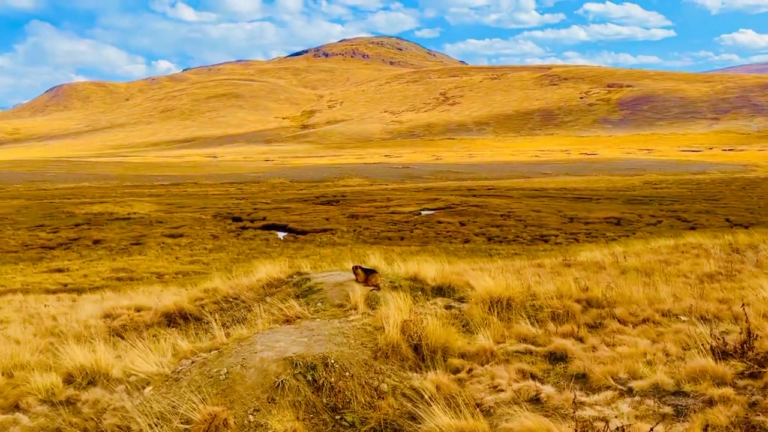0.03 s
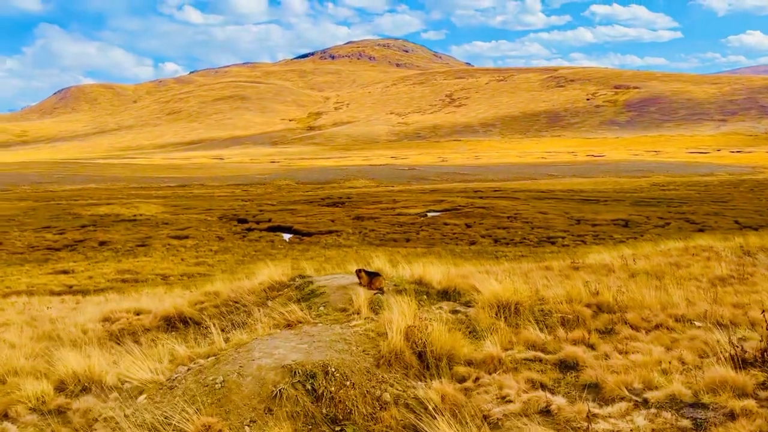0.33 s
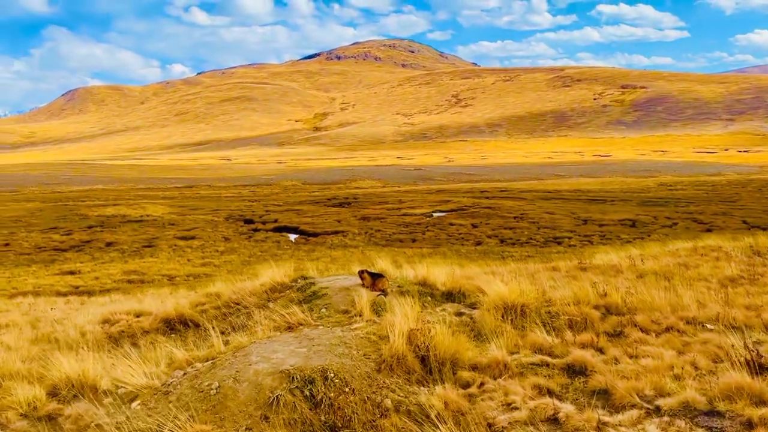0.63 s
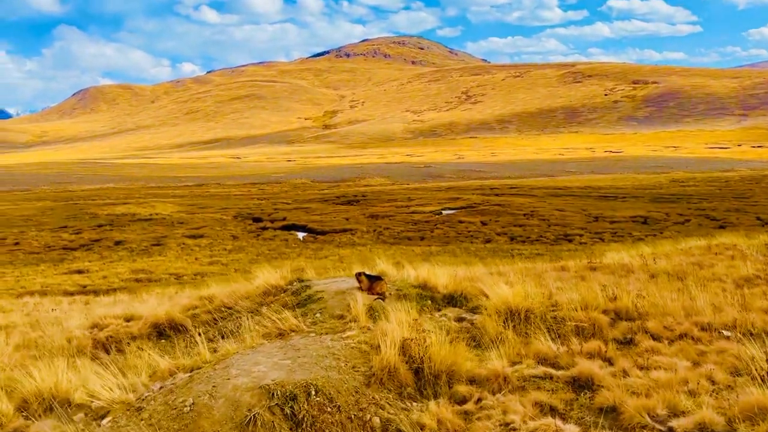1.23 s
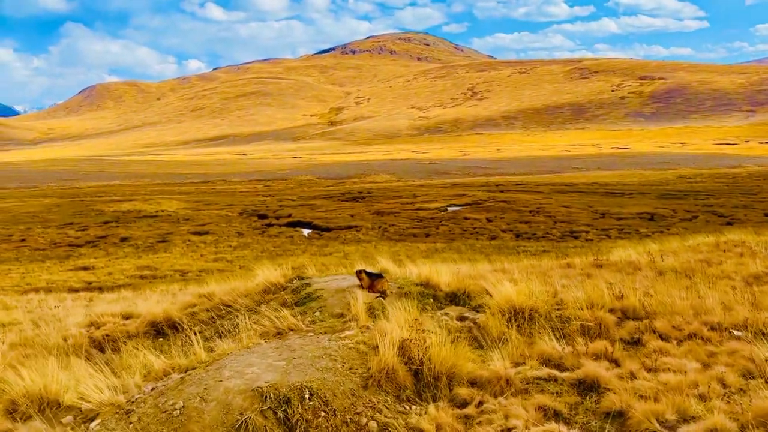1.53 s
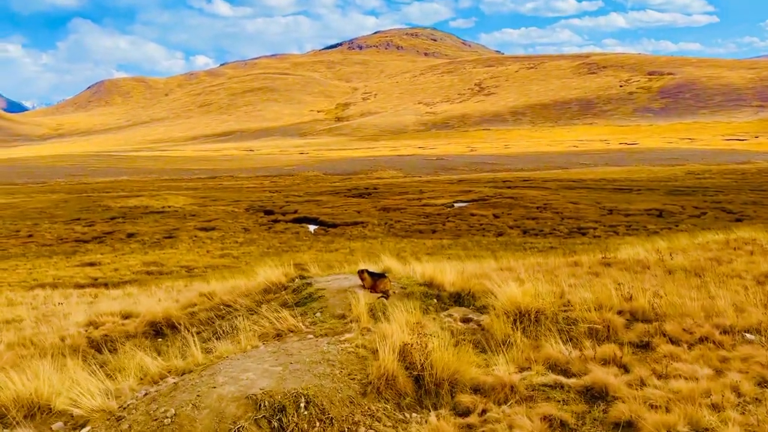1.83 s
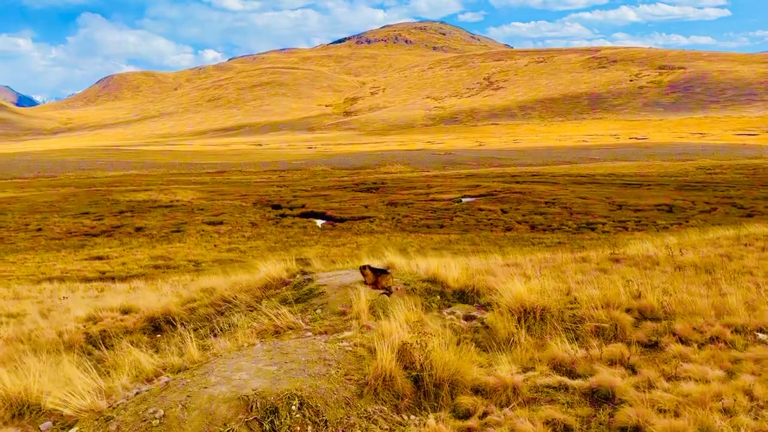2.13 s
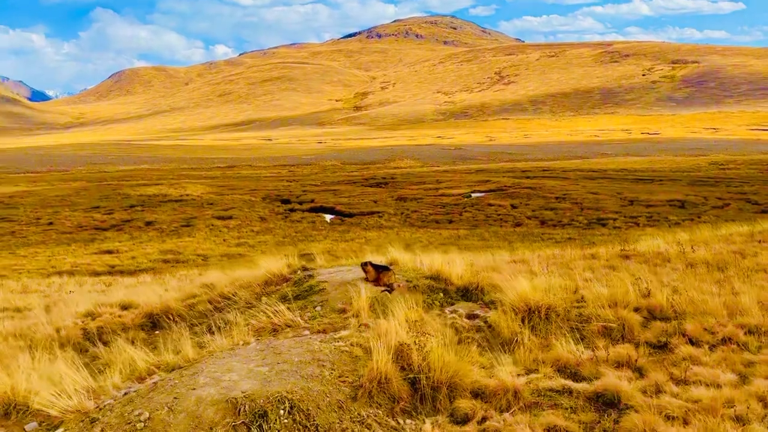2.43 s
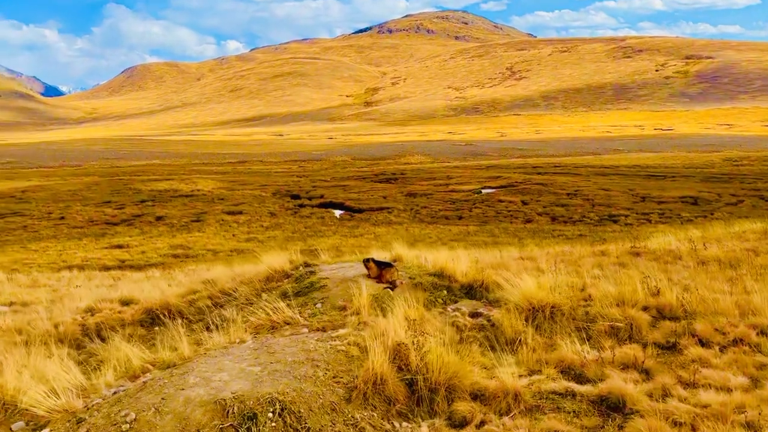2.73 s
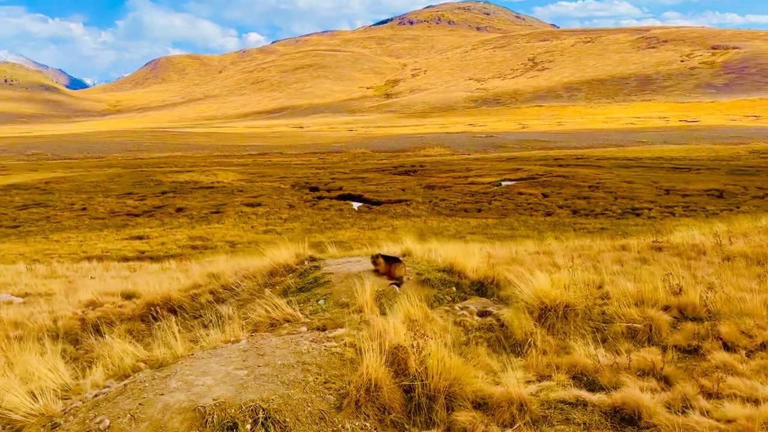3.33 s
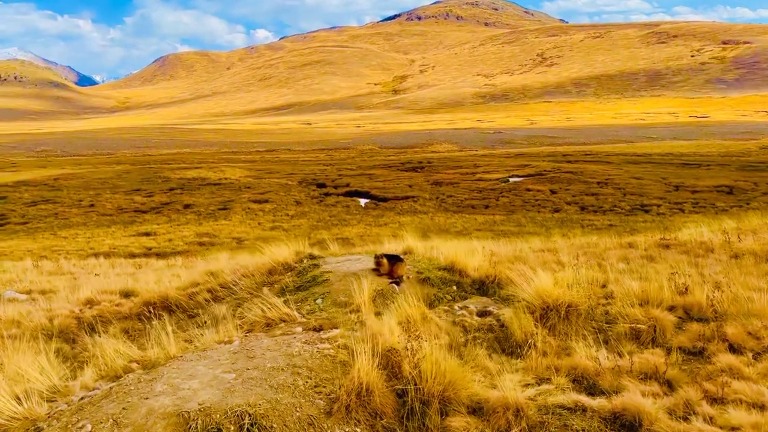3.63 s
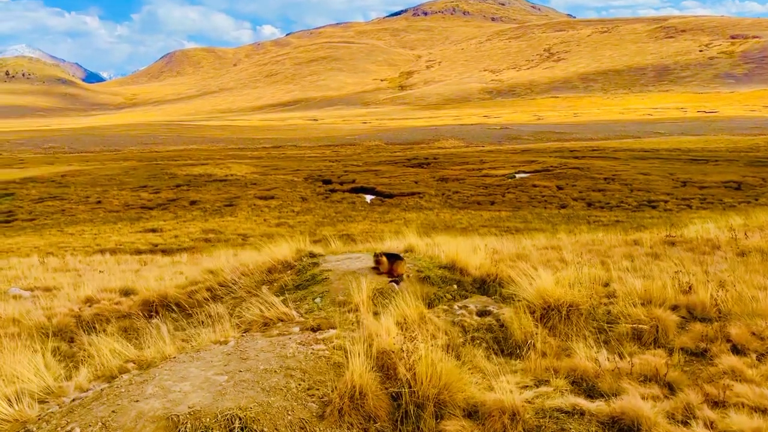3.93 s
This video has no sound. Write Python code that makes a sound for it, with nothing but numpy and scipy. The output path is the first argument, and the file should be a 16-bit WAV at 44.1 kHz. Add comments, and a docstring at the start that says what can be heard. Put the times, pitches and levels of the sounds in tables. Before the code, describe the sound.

A marmot gives harsh, rapid alarm chirps over wind rumbling on the microphone.

```python
"""Open grassland, a stereo microphone out in the wind, a marmot calling from its burrow mound.
It gives harsh alarm chirps, nearly four a second, each a run of uneven rasping pulses in its throat
resonances: a loud head, a weaker hold, a quick release. Dry grass hisses faintly behind it.
Wind rumbles and buffets on the microphone's two ports, now and then overloading it."""
import sys
import numpy as np
from scipy import signal
from scipy.fft import rfft, irfft
from scipy.io import wavfile
from scipy.ndimage import uniform_filter1d, minimum_filter1d, map_coordinates

SR = 44100
rng = np.random.default_rng(int(sys.argv[2]) if len(sys.argv) > 2 else 0)


def inscribe(sig):
    """Save sig as 16-bit PCM at rate SR to the path in sys.argv[1].

    A 1-D sig is mono; a 2-D sig holds one channel per row.
    Samples are clipped to [-1, 1] before scaling.
    """
    pcm = np.round(np.clip(np.atleast_2d(sig).T, -1, 1) * 32767)
    wavfile.write(sys.argv[1], SR, pcm.astype(np.int16))


N = 176400
TIME = np.arange(N) / SR
BIN_HZ = np.maximum(np.arange(N // 2 + 1) * SR / N, 1)


def from_db(db):
    """Decibels to gain."""
    return 10 ** (np.asarray(db) / 20)


def rms_one(x):
    """Scale to unit rms."""
    return x / np.sqrt(np.mean(x ** 2) + 1e-20)


def level(rows):
    """Gain over time from rows of time_s, level_db."""
    return from_db(np.interp(TIME, *np.transpose(rows)))


def over_bins(rows):
    """Rows of freq_hz, value, interpolated to every FFT bin on a log-frequency axis."""
    hz, values = np.transpose(rows)
    return np.interp(np.log(BIN_HZ), np.log(hz), values)


def pan(db):
    """Left and right gains for a left-minus-right level."""
    return from_db(np.array([[.5], [-.5]]) * db)


def swell(t, half_s):
    """A bell-shaped rise and fall around t = 0."""
    return np.exp(-.5 * (t / half_s) ** 2)


def drift(rate_hz):
    """Slow random wander of unit rms."""
    step, settle = 40, 2000
    r = np.exp(-2 * np.pi * rate_hz * step / SR)
    noise = rng.standard_normal(N // step + settle + 2)
    slow = signal.lfilter([1], [1, -2 * r, r * r], noise)[settle:]
    return np.interp(np.arange(N) / step, np.arange(len(slow)), rms_one(slow))


def resonate(x, hz, width_hz, stages=1):
    """A resonance with gain 1 at its peak; more stages make it narrower and steeper."""
    r = np.exp(-np.pi * width_hz / SR)
    poles = [1, -2 * r * np.cos(2 * np.pi * hz / SR), r * r]
    for _ in range(stages):
        x = signal.lfilter(np.array([1, 0, -1]) * (1 - r * r) / 2, poles, x + 1e-18)
    return x


def air(spectrum):
    """Separate noise of a given colour at each of the two ports; rms 1."""
    white = rfft(rng.standard_normal((2, N)))
    return rms_one(irfft(from_db(over_bins(spectrum)) * white, N))


def gusting(eddies, depth_db):
    """Level swings from passing eddies; rms 1."""
    return rms_one(from_db(depth_db * np.clip(eddies, -2.5, 2)))


def grass():
    """Dry grass hisses in the breeze and gives one narrow, high swish."""
    # rise and fall of the hiss: time_s, level_db
    hiss_level = [(0, -51), (.25, -43.5), (.5, -52.5), (.75, -50), (1.0, -51.5), (1.3, -46), (1.62, -44.5),
                  (1.88, -57.5), (2.15, -53.5), (2.45, -47.5), (2.68, -51.5), (2.82, -51.5), (2.94, -39),
                  (3.25, -54), (3.54, -47), (3.63, -53.5), (3.75, -52), (3.85, -61.5), (4, -54)]
    # colour of the hiss: freq_hz, density_db
    hiss_spectrum = [(700, 7), (1500, 7.5), (2500, 2), (4200, -2.5), (7000, 0), (9000, -5), (12000, -29.5),
                     (14500, -3.5), (17000, -11)]
    swish = rms_one(resonate(rng.standard_normal((2, N)), hz=6070, width_hz=1100, stages=2))
    hiss = level(hiss_level) * air(hiss_spectrum) * gusting(drift(25), depth_db=1.5)
    return hiss + from_db(-52) * swish * swell(TIME - 2.556, half_s=.1)


def wind():
    """Low rumble, flutter and higher rustle on the ports; the higher ranges follow the eddies most."""
    # wind strength in each range: time_s, relative_db
    rumble_level = [(0.0, -12.5), (0.03, -21.5), (0.05, -17), (0.78, -10.5), (0.8, -20.5), (0.96, -16.5),
                    (2.56, -15), (2.65, -26.5), (2.68, -17), (3.53, -19.5), (3.61, -11.5), (3.69, -19.5),
                    (3.91, -17.5), (4.0, -25)]
    flutter_level = [(0.0, -35.5), (0.07, -16), (1.86, -23), (1.89, -33.5), (2.06, -23.5), (2.58, -27),
                     (2.64, -43.5), (2.7, -16.5), (2.74, -28), (2.84, -23), (3.15, -32), (3.34, -10.5),
                     (3.53, -32), (3.58, -12), (3.79, -37), (3.83, -18.5), (3.98, -25.5), (4.0, -22)]
    rustle_level = [(0.0, -38.5), (0.67, -29), (1.75, -39.5), (1.77, -30.5), (2.0, -46), (2.06, -26.5),
                    (2.17, -59), (2.21, -30.5), (2.66, -52), (2.68, -39), (2.87, -55), (2.93, -34.5),
                    (2.94, -38.5), (3.17, -51), (3.56, -43), (3.6, -21), (3.63, -61.5), (4.0, -65)]
    # colour of each range: freq_hz, density_db
    rumble_spectrum = [(20, -29.5), (32, -28), (45, -5), (60, -1.5), (100, -3), (150, -8.5), (210, -17.5),
                       (320, -25.5), (600, -91.5)]
    flutter_spectrum = [(70, -27), (140, -6), (220, -0.5), (330, -5), (470, -9), (650, -21), (1000, -67.5),
                        (1800, -74.5)]
    rustle_spectrum = [(250, -50), (450, 0), (620, 6), (850, -2.5), (1200, -13.5), (1800, -29.5),
                       (3000, -37.5), (6000, -49), (12000, -63)]
    eddies = rms_one(.65 * drift(35) + np.array([drift(25), drift(30)]))  # partly shared by the ports
    rumble = from_db(4.5) * level(rumble_level) * air(rumble_spectrum) * gusting(eddies, depth_db=2)
    flutter = from_db(3.5) * level(flutter_level) * air(flutter_spectrum) * gusting(eddies, depth_db=6)
    rustle = from_db(10) * level(rustle_level) * air(rustle_spectrum) * gusting(eddies, depth_db=7.5)
    return rumble + flutter + rustle


def buffets():
    """Single strong eddies swell and die within hundredths of a second, mostly on one port."""
    # eddies striking the microphone: centre_s, half_length_s, level_db, port_balance_db
    hits = [(.113, 0.0034, -6.5, -7.5), (.183, 0.0018, -9.5, 9), (.443, 0.005, -14, -9.5),
            (0.521, .006, -10, -11.5), (0.6, 0.0026, -11.5, -10), (0.663, 0.0044, -14, 4),
            (0.688, 0.0019, -13, -4), (0.836, 0.02, -10.5, 10.5), (0.94, 0.011, -11, -8.5),
            (1.029, 0.0056, -13.5, 1), (1.132, 0.0065, -14, -16), (1.375, 0.04, -14, 12),
            (1.5, 0.0036, -13.5, -11.5), (1.771, 0.0024, -17, -10.5), (1.835, 0.0059, -11, 3.5),
            (2.066, 0.01, -17, -17), (2.121, 0.0059, -13, 13), (2.209, 0.0065, -16, -8.5),
            (2.695, 0.0034, -7, 12.5), (2.827, 0.0055, -8, -10.5), (2.949, 0.0065, -10.5, 12),
            (3.255, 0.015, -21, -10.5), (3.309, 0.0078, -17.5, 7.5), (3.592, 0.0068, -4.5, -14.5),
            (3.834, 0.0027, -24, 9), (3.878, 0.0036, -15, -9.5)]
    # colour of a buffet: freq_hz, density_db
    spectrum = [(80, -46), (170, -0.5), (300, 0.5), (450, -2), (650, -19.5), (1000, -39), (2000, -49.5),
                (5000, -88)]
    envelope = sum(from_db(db) * pan(balance_db) * swell(TIME - centre_s, half_s)
                   for centre_s, half_s, db, balance_db in hits)
    return air(spectrum) * envelope


def pops():
    """Dry grass crackles: brief sharp snaps, dulled and ringing for an instant."""
    # grass crackles: start_s, relative_db
    snaps = [(.47, -22), (.509, -32), (0.656, -30), (0.828, -19), (.91, -13.5), (1.018, -23), (1.049, -22),
             (2.698, -14), (2.894, -16), (2.9222, -3)]
    dull_hz, ring_hz, width_hz = 2000, 1020, 370
    clicks = np.zeros(N)
    for start_s, db in snaps:
        clicks[int(start_s * SR)] += from_db(db)
    dulled = signal.sosfilt(signal.butter(1, dull_hz, fs=SR, output="sos"), clicks + 1e-18)
    makeup_gain = SR / (2 * np.pi * width_hz)
    return resonate(dulled, ring_hz, width_hz) * makeup_gain * pan(db=-2.5)


def stereo_image(ports):
    """Each port feeds both channels, with a phase shift that sets how alike they are."""
    # likeness of left and right: freq_hz, correlation
    likeness = [(60, 0.48), (130, 0.22), (290, -0.15), (640, -0.42), (1410, 0.28), (3100, 0.14),
                (6800, .08), (15000, -0.25)]
    turn = np.exp(.5j * np.arccos(np.clip(over_bins(likeness), -1, 1)))
    a, b = rfft(ports)
    return irfft(np.array([a * turn + b / turn, a / turn + b * turn]), N) / np.sqrt(2)


def ground_scatter(calls, level_db=-28, t60_s=.27):
    """A faint, short echo scattered from grass and ground."""
    t = TIME[:SR // 2]
    tail = rng.standard_normal((2, len(t))) * from_db(-60 * t / t60_s)
    tail /= np.sqrt(np.sum(tail[0] ** 2))
    return from_db(level_db) * signal.fftconvolve(calls, tail, axes=1)[:, :N]


def squeak(t, hz, fall_hz_per_s, half_s):
    """A thin, brief whistle that plunges through hz at t = 0."""
    return np.sin(2 * np.pi * (hz - .5 * fall_hz_per_s * t) * t) * swell(t, half_s)


def voiced_glide(t, start_hz, fall_s=.035, jitter=.018):
    """The voiced part of a chirp: an unsteady pitch that plunges throughout."""
    # harmonics of the voice, fundamental first: relative_db
    harmonics = [-6.5, -9.5, -17, -18.5]
    wobble = rms_one(uniform_filter1d(rng.standard_normal(len(t)), size=30))
    pitch_hz = start_hz * np.exp(-t / fall_s) * (1 + jitter * wobble)
    phase = 2 * np.pi * np.cumsum(pitch_hz) / SR
    return np.sqrt(2) * sum(from_db(db) * np.sin(k * phase) for k, db in enumerate(harmonics, 1))


def air_puffs(t, length_s, sharpest_s):
    """Uneven puffs over steady breath, with one sharp pulse and another as the throat closes."""
    rate_hz, jitter, decay_s, breath = 480, .37, .00068, .23
    spread_db, sharpest_db, closing_db = .5, 6, -10
    gap_chance, size_chance = rng.standard_normal((2, 60))
    starts = (np.cumsum(np.exp(jitter * gap_chance)) - 1) / rate_hz
    starts = np.append(starts, [sharpest_s, length_s - .002])
    sizes = from_db(np.append(-spread_db * np.clip(size_chance, -2, 2), [sharpest_db, closing_db]))
    age = t - starts[:, None]
    return breath + sizes @ ((age >= 0) * np.exp(-np.abs(age) / decay_s))


def throat(puffs, resonances, stretch):
    """Pulsed turbulence through steep throat resonances, its slow level evened."""
    rasp = np.zeros(len(puffs))
    for hz, width_hz, db in resonances:
        turbulence = puffs * rng.standard_normal(len(puffs))
        rasp += from_db(db) * resonate(turbulence, hz * stretch, width_hz, stages=2)
    return rasp / np.sqrt(uniform_filter1d(rasp ** 2, size=700) + 1e-12)


def chirp_envelope(t, head_db, hold_db, length_s):
    """Fast attack, loud head, weaker hold, quick release."""
    attack_s, head_s, head_fade_s, release_db_per_s = .0018, .018, .006, 1897
    head = .5 - .5 * np.tanh((t - head_s) / head_fade_s)
    release_db = release_db_per_s * np.maximum(t - length_s, 0)
    return np.clip(t / attack_s, 0, 1) * from_db(hold_db + (head_db - hold_db) * head - release_db)


def marmot(left_lead_s=.00014):
    """Chirps with a bright throat band, a lower rasp and a falling voice, reaching the left port first."""
    # alarm chirps: start_s, head_db, hold_db, length_s, sharpest_pulse_s, resonance_hz,
    # start_pitch_hz, voiced_db, closing_squeak_db
    chirps = [(.003, -20, -23, .044, 0.0081, 6640, 3930, -5.5, -42),
              (0.284, -15.5, -20, .044, .012, 6500, 4110, -3, -31),
              (0.567, -21.5, -22, 0.036, 0.067, 6450, 4460, -3, -22),
              (0.84, -21, -27, 0.036, 0.0071, 6600, 3340, -7.5, -46),
              (1.111, -20.5, -22.5, 0.038, 0.014, 6510, 2905, -4.5, -42),
              (1.392, -20.5, -25.5, 0.037, 0.00078, 6650, 3600, -10.5, -46),
              (1.666, -16, -23.5, 0.037, 0.019, 6640, 4230, -12, -30),
              (1.951, -17, -29, 0.037, 0.0089, 6670, 3610, -8, -43),
              (2.224, -25, -25, 0.036, 0.0042, 6600, 3770, -5, -32.5),
              (2.501, -21.5, -27, 0.036, 0.0036, 6630, 2740, -2, -48),
              (2.777, -26, -27, 0.031, 0.0082, 6420, 3530, -10, -49),
              (3.07, -15.5, -18, 0.034, 0.016, 6650, 3880, -5.5, -39),
              (3.355, -16, -23.5, 0.04, 0.0046, 6710, 3570, -3.5, -34),
              (3.664, -16, -22, 0.04, 0.017, 6540, 3700, -12, -33.5),
              (3.945, -13.5, -28, 0.034, 0.014, 6700, 3050, -9.5, -30)]
    # bright throat resonances, for a main resonance of 6600 Hz: centre_hz, width_hz, relative_db
    bright_bands = [(6210, 890, -2), (6760, 920, -4), (7554, 730, -4), (9040, 1220, -9),
                    (10000, 620, -33.5), (12310, 390, -16), (14470, 960, -14.5)]
    # lower resonances of the rasp: centre_hz, width_hz, relative_db
    rasp_bands = [(1320, 560, 4.5), (2185, 600, 3.5), (3490, 510, 7), (4580, 500, -6.5)]
    ports, t = np.zeros((2, N + SR)), TIME[:SR // 10]
    for start_s, head_db, hold_db, length_s, sharpest_s, hz, pitch_hz, voiced_db, squeak_db in chirps:
        puffs = air_puffs(t, length_s, sharpest_s)
        stretch = hz / 6600
        direct = throat(puffs, bright_bands, stretch) * pan(db=1.5)
        scattered = from_db(-9) * np.array([throat(puffs, bright_bands, stretch) for _ in range(2)])
        bright = from_db(-1.5) * (direct + scattered) * chirp_envelope(t, head_db, hold_db, length_s)
        rasp = from_db(-7.5) * throat(puffs, rasp_bands, stretch)
        voiced = from_db(voiced_db - .5) * voiced_glide(t, pitch_hz)
        low = (rasp + voiced) * pan(db=-5.5) * chirp_envelope(t, head_db, hold_db - 6.5, length_s)
        closing = np.sqrt(2) * squeak(t - length_s, hz=6040, fall_hz_per_s=50000, half_s=.005)
        i = int(start_s * SR)
        ports[:, i:i + len(t)] += bright + low + from_db(squeak_db) * closing
    late_right = map_coordinates(ports[1], [np.arange(N) - left_lead_s * SR], order=3)
    return np.array([ports[0, :N], late_right])


def scene():
    """The marmot in open grass, two of its chirps with an extra squeak, and wind on the microphone."""
    calls = marmot()
    calls += from_db(-16) * squeak(TIME - 1.976, hz=14600, fall_hz_per_s=560000, half_s=.0015)
    calls += from_db(-8) * squeak(TIME - 3.983, hz=7300, fall_hz_per_s=330000, half_s=.0013)
    echo = ground_scatter(calls)
    breeze = stereo_image(wind() + buffets() + grass()) * pan(db=-1)
    return calls + echo + breeze + pops()


def record(dry):
    """The recorder's fast limiter holds the peaks at full scale; a steep low-pass cuts the top."""
    window_samples, cutoff_hz = 89, 15900
    gain = minimum_filter1d(1 / np.maximum(np.abs(dry), 1), size=window_samples, axis=1)
    limited = dry * uniform_filter1d(gain, size=window_samples, axis=1)
    return signal.sosfilt(signal.ellip(10, .1, 70, cutoff_hz, fs=SR, output="sos"), limited)


dry = scene()
out = record(dry)
inscribe(out)
```